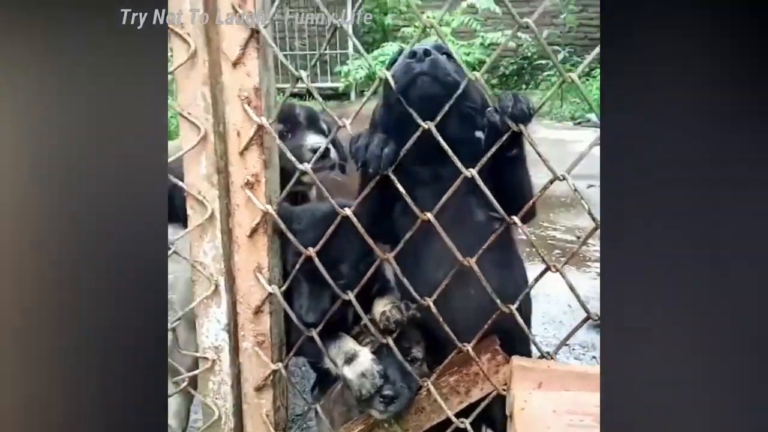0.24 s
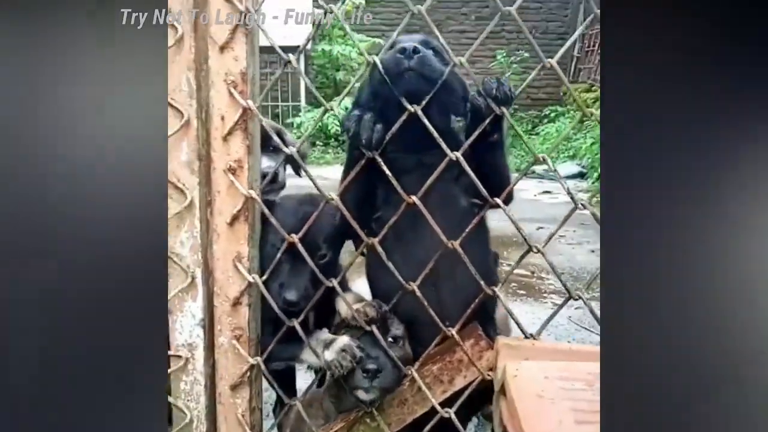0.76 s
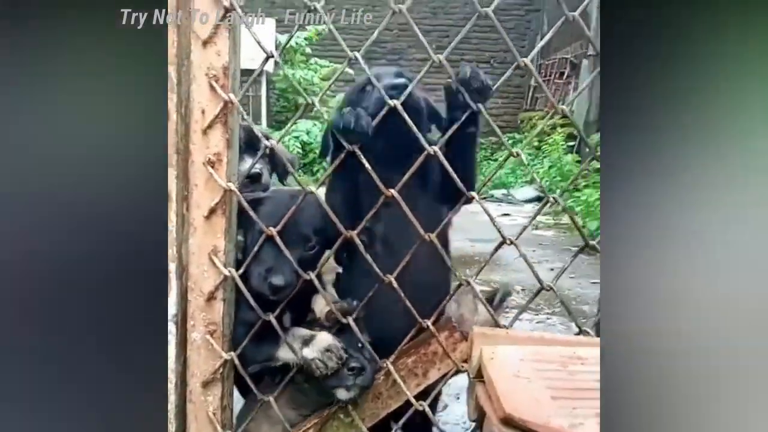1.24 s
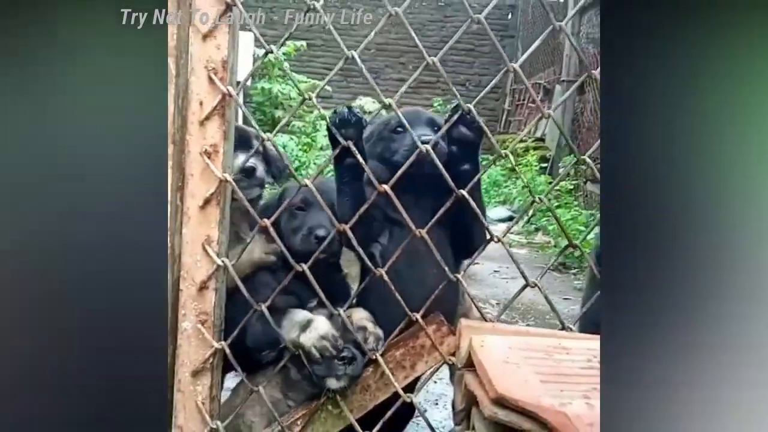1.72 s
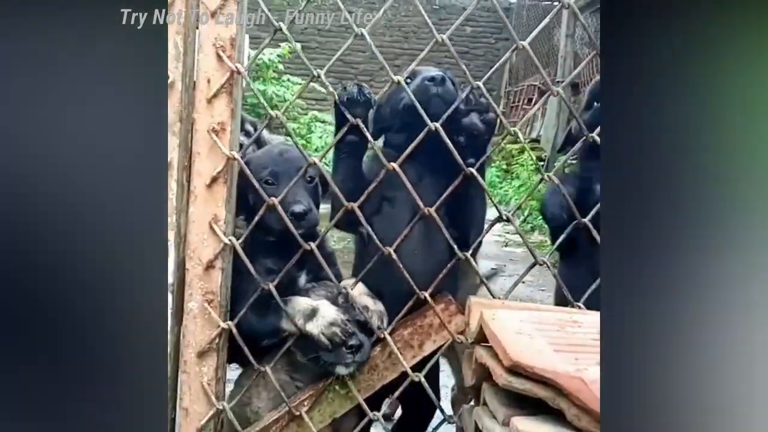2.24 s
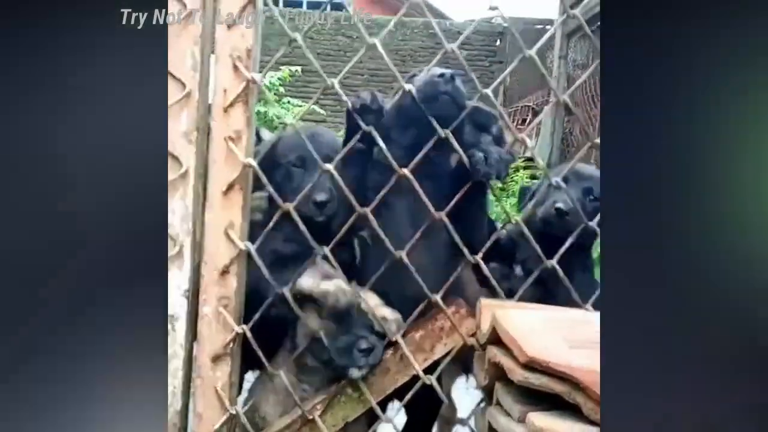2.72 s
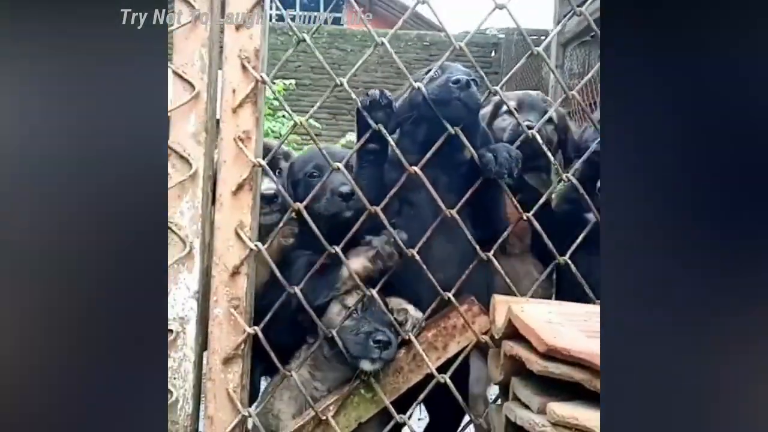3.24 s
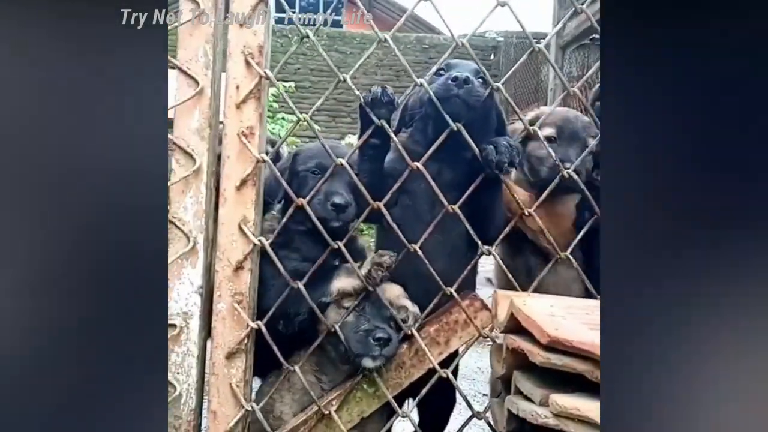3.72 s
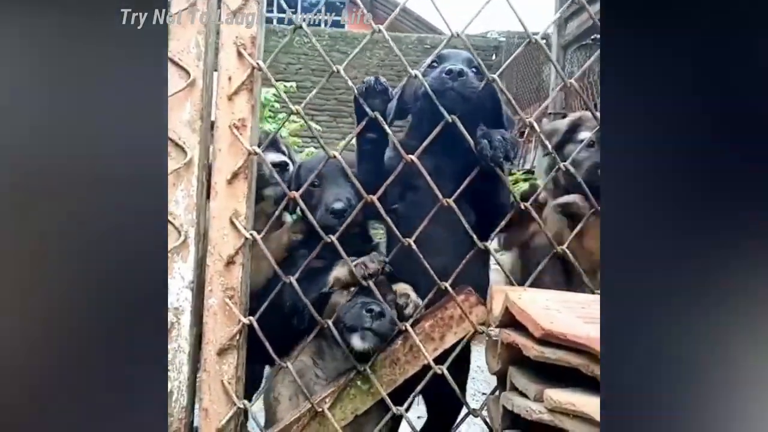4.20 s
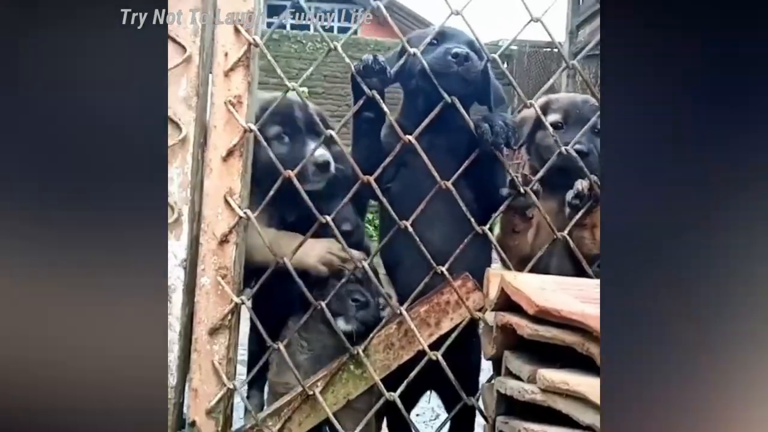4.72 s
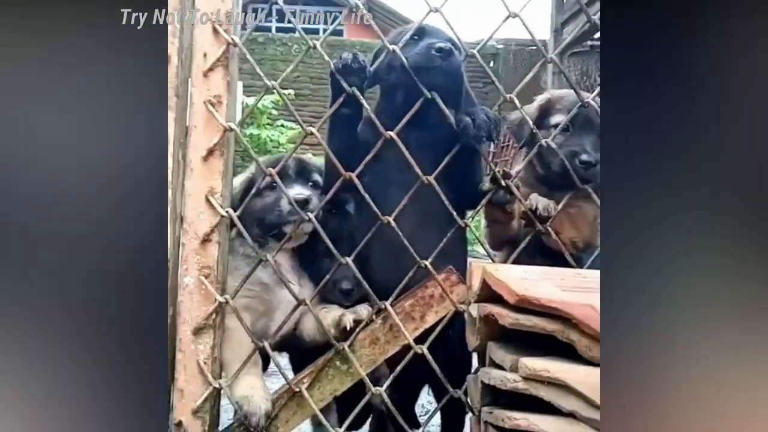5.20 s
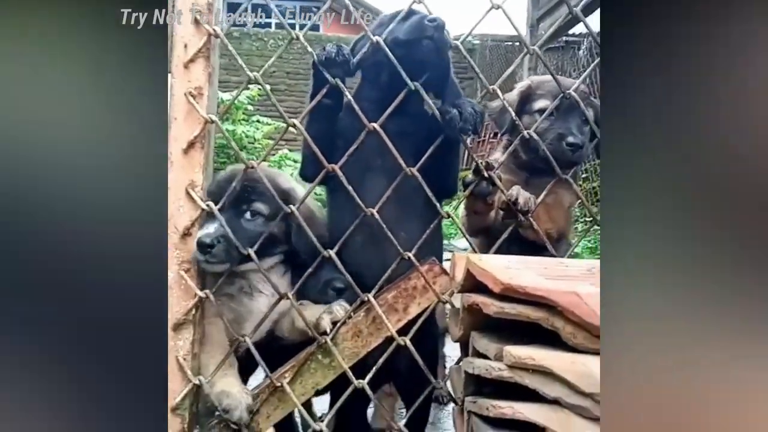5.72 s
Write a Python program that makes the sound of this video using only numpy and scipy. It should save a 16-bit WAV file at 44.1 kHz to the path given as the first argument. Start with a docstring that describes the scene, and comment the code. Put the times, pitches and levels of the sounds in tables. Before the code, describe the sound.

A litter of puppies cries together outdoors, their high whines and sharp yelps mixing with soft panting and faint squeaks.

```python
"""Puppies at a yard fence

A litter of puppies yelps, whimpers and whines close by. Each voice is a nearly pure tone
that gets brighter as the mouth opens. Air in their noses makes thin, high whistles, and
their panting comes as puffs of hiss. The yard adds a short echo. Under it all lies a low
outdoor rumble, which the microphone's gain control pushes down during loud calls."""
import sys
import numpy as np
from scipy import signal
from scipy.io import wavfile
from scipy.ndimage import uniform_filter1d

SR = 44100
rng = np.random.default_rng(int(sys.argv[2]) if len(sys.argv) > 2 else 0)


def store_pcm(level_fs):
    """Save levels as 16-bit WAV."""
    pcm = np.round(np.clip(level_fs, -1, 1) * 32767).astype(np.int16)
    wavfile.write(sys.argv[1], SR, np.atleast_2d(pcm).T)


N = 262395

# How throat, mouth and microphone together colour the overtones.
# Each row: frequency in Hz, boost or cut in dB.
OVERTONE_COLOUR = [(1600, 2), (2250, -14.5), (2900, -4), (4700, -6), (5700, -16), (7000, -9.5),
                   (9500, -30.5), (14000, -51.5)]


def voice(rows, mouth_start_db, mouth_end_db, ring_hz=4126, rasp=(0, 0, 0)):
    """Vocal folds make a tone; an open mouth lets overtones out and boosts those near its ring."""
    t, hz, gain = curves(rows)
    count = len(t)
    break_start, break_length, roughness = rasp
    inside_break = np.minimum(t - break_start, break_start + break_length - t)
    rough = roughness * np.clip(inside_break / .0026 + .5, 0, 1)
    # The folds always waver a little. When the voice breaks, they shake and throb unevenly.
    hz = hz * (1 + .005 * wander(count, size=600) + .004 * wander(count, size=150))
    turns = np.cumsum(hz * (1 + .5 * rough * wander(count, size=60))) / SR
    throb_hz = 170 * (1 + .4 * wander(count, size=250))
    throb = np.sin(2 * np.pi * np.cumsum(throb_hz) / SR)
    turns += .35 * rough * throb
    mouth_db = np.linspace(mouth_start_db, mouth_end_db, count) + 30 * rough  # a break takes effort
    mouth_db -= 12 * np.exp(-(t - t[0]) / .016)  # the lips part just after the voice starts
    k = np.arange(2, 17)[:, None]  # overtones lie at 2 to 16 times the pitch
    ring_db = 5.56 * np.exp(-((k * hz - ring_hz) / 550) ** 2)
    flicker_db = 3.74 * wander(k.size * count, size=700).reshape(k.size, -1)
    strengths = amp(colour_db(OVERTONE_COLOUR, k * hz) + ring_db + flicker_db)
    overtones = (strengths * np.sin(2 * np.pi * k * turns)).sum(0)
    thump = 3 * rough * wander(count, size=70)  # a low thump sounds with each break
    sound = np.sin(2 * np.pi * turns) + amp(mouth_db) * overtones + thump
    tremble_db = 1.8 * wander(count, size=250) + 22 * rough * (throb - .5)
    return t[0], gain * sound * amp(tremble_db)


# Loud yelps. Each row: start, time of the break, its length, time of the slump and end in seconds;
# low, top, slumped and last pitch in Hz; level and tail level in dB; roughness of the break.
YELPS = [(2.232, 2.267, 0.025, 2.385, 2.48, 1063, 1561, 1356, 1288, -18, -18.5, 0.2),
         (2.606, 2.633, 0.028, 2.722, 2.95, 1080, 1598, 1369, 1208, -20.5, -20, 0.092),
         (3.091, 3.116, 0.019, 3.224, 3.505, 977, 1414, 1222, 1274, -22.5, -15, 0.034),
         (3.629, 3.655, .065, 3.83, 3.96, 919, 1300, 1063, 1115, -21, -18.5, 0.12),
         (4.072, 4.099, 0.065, 4.23, 4.3, 933, 1074, 1012, 931, -23.5, -23, 0.085)]


def yelp(start, leap, length, slump, end, low_hz, top_hz, slumped_hz, last_hz, db, tail_db, roughness):
    """The voice starts low, breaks upward with a rasp, slumps and trails off as a whine."""
    landing = leap + length
    rows = [(start, low_hz * .9402, db - 6.5),
            (leap, low_hz, db),
            (landing - .012, low_hz * 1.0598, db),
            (landing, top_hz * .9725, db),
            (max(slump - .04, landing + .0063), top_hz, db),
            (slump, slumped_hz, db - 6),
            (end - .035, last_hz, tail_db),
            (end, last_hz * .902, tail_db - 6.5)]
    return voice(rows, mouth_start_db=9.5, mouth_end_db=-9.5, rasp=(leap, length, roughness))


# Long whines. Each row: mouth opening at the start and at the end in dB, the mouth's ring in Hz,
# then a list of points (time in seconds, pitch in Hz, level in dB).
WHINES = [(9, -8.5, 3000, [(0.221, 853, -27.5), (0.235, 808, -34.5), (0.39, 758.4, -31.5),
          (0.42, 830, -26.5), (0.455, 799, -31.5)]), (-5, -11.5, 2380, [(1.7, 960, -18),
          (1.722, 898, -19.5), (1.765, 1389, -18), (1.8, 1295, -25.5), (1.85, 1346, -22.5),
          (1.95, 1277, -18.5), (2.06, 1286, -19), (2.095, 1127, -23)]),
          (3, -11.5, 4440, [(4.27, 1795, -14.5), (4.295, 1616, -34), (4.305, 1430, -17.5),
          (4.318, 1482, -15), (4.352, 1500, -25), (4.372, 1378, -17.5), (4.383, 1630, -22),
          (4.5, 1510, -36.5)]), (18, -14, 4020, [(4.595, 1330, -29.5), (4.61, 1690, -29),
          (4.625, 1578, -22), (4.65, 1847, -23), (4.71, 1696, -22.5), (4.73, 1266, -23.5),
          (4.765, 1262, -14.5)]), (-11.5, -9, 2160, [(4.67, 913, -44), (4.75, 804, -33), (4.84, 880, -23),
          (4.95, 813.5, -24), (5.08, 765, -29), (5.12, 671, -31.5)]), (2, -12.5, 3500, [(5.31, 707, -31),
          (5.335, 644, -29.5), (5.355, 783, -28), (5.45, 723, -40), (5.95, 837, -36)]),
          (-18, -1.5, 4700, [(5.6, 972, -31.5), (5.705, 1100, -40), (5.725, 1174, -25), (5.76, 1032, -25),
          (5.78, 1186, -27), (5.81, 1036, -24), (5.85, 1106, -30)])]


def whine(mouth_start_db, mouth_end_db, ring_hz, rows):
    """A drawn-out voice that winds up and down in pitch."""
    return voice(rows, mouth_start_db, mouth_end_db, ring_hz)


# Short whimpers. Each row: start, bend and end in seconds, the pitch at each of them in Hz,
# level in dB, mouth opening halfway through in dB.
WHIMPERS = [(0.034, 0.063, 0.08, 1034, 1302, 1110, -25, -12.5),
            (0.086, 0.151, 0.25, 864, 1206, 1157, -26.5, -11),
            (0.12, 0.126, 0.15, 1435, 1383, 1307, -22, -12),
            (0.258, 0.331, 0.345, 1350, 1192, 1180, -32, -22),
            (0.287, 0.372, 0.39, 868, 1310, 1130, -29, -17),
            (0.487, 0.492, 0.515, 1080, 1080, 990, -26.5, -38),
            (0.616, 0.632, 0.65, 1170, 893, 815, -39, -5.5), (0.71, 0.755, 0.81, 1226, 1349, 1130, -27, -9),
            (0.825, 0.835, 0.855, 1028, 801, 850, -28, -8.5),
            (1.094, 1.132, 1.19, 1034, 851, 1062, -28.5, -16),
            (1.11, 1.247, 1.32, 590, 802, 672, -35.5, -7.5),
            (1.447, 1.488, 1.53, 1282, 1345, 1197, -22, -13),
            (1.526, 1.544, 1.645, 1199, 1217, 1258, -23.5, -9.5),
            (1.574, 1.602, 1.7, 782, 940, 1080, -29.5, -18),
            (1.691, 1.786, 1.86, 1306, 1266, 1240, -24.5, -8.5),
            (2.982, 3.056, 3.09, 1138, 1355, 1116, -23.5, -7.5),
            (3.095, 3.199, 3.31, 1008, 1006, 896, -39, -24),
            (3.513, 3.556, 3.63, 1190, 960, 924, -26.5, -13.5),
            (3.795, 3.95, 4.02, 1255, 1550, 1686, -36.5, -6),
            (3.957, 4.015, 4.06, 932, 908, 1052, -27, -14),
            (4.337, 4.483, 4.515, 900, 936, 1127, -31.5, -7),
            (4.395, 4.466, 4.585, 1356, 1398, 1337, -27, -8),
            (4.506, 4.508, 4.56, 1180, 1157, 1090, -25.5, -9),
            (4.935, 4.969, 5.0, 894, 1012, 1174, -29, -9.5), (5.072, 5.206, 5.24, 933, 1074, 1234, -30, -9),
            (5.241, 5.293, 5.37, 944, 1058, 896, -27, -20), (5.372, 5.385, 5.42, 953, 1224, 1044, -26, -10)]


def whimper(row, closing_db=6.5):
    """A short cry that bends once in pitch and gets duller as the mouth closes."""
    *call, mouth_db = row
    return voice(bent(*call), mouth_db + closing_db / 2, mouth_db - closing_db / 2)


# Long nose whistles, one list each. Each row: time in seconds, pitch in Hz, base level in dB.
LONG_WHISTLES = [
    [(5.16, 7130, -35.5), (5.22, 7100, -31), (5.25, 7500, -29.5), (5.29, 7197, -28), (5.31, 7070, -34)],
    [(5.48, 7000, -28.5), (5.54, 7500, -26.5), (5.62, 6620, -24.5), (5.67, 6670, -26), (5.68, 7240, -28),
     (5.7, 6000, -39)],
    [(5.85, 7230, -30.5), (5.91, 7445, -21), (5.93, 8800, -48), (5.95, 7040, -23)],
]
# Short ones. Each row: start, a time that steers the pitch glide (sometimes outside the whistle)
# and end in seconds, a pitch for each in Hz, base level in dB.
SHORT_WHISTLES = [(0.209, 0.213, 0.226, 8700, 8820, 8330, -32),
                  (0.482, 0.507, 0.533, 7630, 11650, 7100, -45), (1.602, 1.7, 1.66, 9940, 10800, 8400, -35),
                  (1.83, 1.85, 1.89, 12100, 13150, 11600, -41.5),
                  (1.96, 2.006, 2.12, 7760, 7080, 7200, -40), (2.519, 2.55, 2.6, 7550, 6400, 6690, -35),
                  (2.911, 2.9, 2.95, 7800, 6800, 8110, -33.5)]


def whistle(rows):
    """Air whistles in the nose: one strong tone, with faint ones below and above it."""
    t, hz, gain = curves(rows)
    turns = np.cumsum(hz * (1 + .0036 * wander(len(t), size=100))) / SR
    tones = sum(amp(db) * np.sin(2 * np.pi * ratio * turns) * (ratio * hz < SR / 2)
                for ratio, db in [(.5, -27.5), (1, 10), (1.5, -28), (2, -22)])
    return t[0], gain * tones


def squeaks():
    """Other noses add 120 tiny, faint whistles at random times, each with a wandering pitch."""
    track = np.zeros(N)
    for when, height, softness, *bends in rng.random((120, 7)):
        pitches = (6800 + 3000 * height ** 2) * (1 - .16 * np.array(bends))
        rows = [(when * N / SR + .011 * k, hz, -41 - 10 * softness) for k, hz in enumerate(pitches)]
        add(track, *whistle(rows))
    return track


# The colour of breath hiss. Each row: frequency in Hz, relative level in dB.
BREATH_COLOUR = [(900, -10.5), (2200, -8.5), (4000, -9.5), (7000, 0), (9500, -9.5), (12500, -27),
                 (15000, -50) ]
# Stretches of panting. Each row: start in seconds, length in seconds, level in dB.
PANTS = [(0.041, 0.43, -31), (0.63, 0.26, -37.5), (1.099, 0.934, -36), (2.29, 3.4, -36)]


def panting():
    """Breath hisses in puffs over a faint rest. Also returns its swell: how busy the litter is."""
    gain = np.full(N, amp(-44.5))
    for start, length, db in PANTS:
        t = np.arange(0, length + .3, 1 / SR)
        onset = np.minimum(t / .0066, 1)
        add(gain, start, onset * amp(db - 330 * np.maximum(t - length, 0)))  # fades 330 dB a second
    gain *= amp(2.2 * wander(N, size=1200))
    return gain * noise(BREATH_COLOUR, size=512), gain / gain.mean()


def yard_echo(sound):
    """The ground and walls scatter the sound back; it dies away in a quarter of a second."""
    t = np.arange(SR // 4) / SR
    tail = rng.standard_normal(len(t)) * amp(-60 * t / .25)
    return amp(-14) * signal.fftconvolve(sound, tail / np.linalg.norm(tail))[:N]


# The colour of the outdoor rumble. Each row: frequency in Hz, relative level in dB.
RUMBLE_COLOUR = [(35, -42), (65, 0.5), (170, 0.5), (300, -17), (700, -30)]


def rumble():
    """Low outdoor noise that gently swells and sinks."""
    return amp(-34.5) * noise(RUMBLE_COLOUR, size=2048) * amp(1.76 * wander(N, size=2500))


def bent(start, steer, end, start_hz, steer_hz, end_hz, db):
    """The three points that guide a short call's pitch and level."""
    return [(start, start_hz, db - 1), (steer, steer_hz, db), (end, end_hz, db + 1.5)]


def curves(rows):
    """Joins points (seconds, Hz, dB) into times, a smooth pitch and a gain with faded ends."""
    times, pitches, levels = np.transpose(rows)
    t = np.arange(times[0], times[-1], 1 / SR)
    hz = uniform_filter1d(np.interp(t, times, pitches), size=300, mode="nearest")
    fade = np.clip(np.minimum(t - times[0], times[-1] - t) / .003, 0, 1)
    return t, hz, np.sqrt(2) * fade * amp(np.interp(t, times, levels))


def noise(colour, size):
    """Noise of a given colour whose level drifts in patches of time and frequency."""
    real, imag, patches = rng.standard_normal((4 * N // size + 5, size // 2 + 1, 3)).T
    patches = uniform_filter1d(patches, size=12, axis=0)
    patches = unit_level(uniform_filter1d(patches, size=12, axis=1))
    level_db = colour_db(colour, np.fft.rfftfreq(size, 1 / SR))[:, None] + 2 * patches
    spectrum = (real + 1j * imag) * amp(level_db)
    return unit_level(signal.istft(spectrum, nperseg=size, noverlap=3 * size // 4)[1][:N])


def wander(count, size):
    """A smooth random wobble that changes over about size samples."""
    return unit_level(uniform_filter1d(uniform_filter1d(rng.standard_normal(count), size), size))


def colour_db(colour, hz):
    """Looks up the level at any frequency, gliding between the rows of a colour table."""
    frequencies, levels = np.transpose(colour)
    return np.interp(np.log(hz + 1), np.log(frequencies + 1), levels)


def amp(db):
    """Turns dB into a number to multiply by."""
    return 10 ** (np.asarray(db) / 20)


def unit_level(x):
    """Scales a signal so that its typical size (rms) is 1."""
    return x / np.sqrt(np.mean(x ** 2) + 1e-20)


def add(mix, start, sound):
    """Adds a sound to the mix at start seconds."""
    part = mix[round(start * SR):][:len(sound)]
    part += sound[:len(part)]


def scene():
    """The puppies' calls, their echo, their breath and the rumble, in one channel."""
    pups = np.zeros(N)
    for row in YELPS:
        add(pups, *yelp(*row))
    for row in WHIMPERS:
        add(pups, *whimper(row))
    for row in WHINES:
        add(pups, *whine(*row))
    breath, busy = panting()
    voice_power = uniform_filter1d(pups ** 2, size=1500)
    breath /= np.sqrt(1 + voice_power / amp(-39))  # the hiss dips while a call is loud
    for rows in LONG_WHISTLES + [bent(*row) for row in SHORT_WHISTLES]:
        add(pups, *whistle(rows))
    pups += busy * squeaks()
    return np.array([pups + breath + rumble() + yard_echo(pups)])


def suppress_hiss(sound):
    """A noise suppressor turns each frequency down by up to 9 dB when near its usual quiet level."""
    spectrum = signal.stft(sound, nperseg=512, noverlap=384)[2]
    level_db = 10 * np.log10(uniform_filter1d(abs(spectrum) ** 2, size=3, axis=2) + 1e-14)
    above_quiet_db = level_db - np.percentile(level_db, 20, axis=2, keepdims=True)
    gain = amp(.6 * np.clip(above_quiet_db - 10, -15, 0))
    return signal.istft(spectrum * gain, nperseg=512, noverlap=384)[1][:, :N]


def gain_control(sound, limit_db=-25.5, recovery_db_per_s=60):
    """A gain that drops quickly when the sound passes the limit, then creeps back up."""
    level_db = 10 * np.log10(abs(uniform_filter1d(sound ** 2, size=1500)) + 1e-12)
    recovery_db = np.arange(N) / SR * recovery_db_per_s
    held_db = np.maximum.accumulate(level_db + recovery_db, axis=1) - recovery_db
    over_db = np.maximum(held_db - limit_db, 0)
    return amp(-uniform_filter1d(over_db, size=300))


def record(dry):
    """The microphone lowers the bass under loud calls, cuts hiss, rounds peaks and dulls the top."""
    bass = signal.sosfiltfilt(signal.butter(3, 600, fs=SR, output="sos"), dry)
    ducked = suppress_hiss(dry - bass) + bass * gain_control(dry)
    rounded = .85 * np.tanh(ducked)
    dulled = signal.sosfilt(signal.butter(4, 12500, fs=SR, output="sos"), rounded)
    treble_cut = signal.firwin(511, cutoff=15700, window=("kaiser", 9), fs=SR)
    return signal.oaconvolve(dulled, treble_cut[None], "same")


dry = scene()
out = record(dry)
store_pcm(out)
```